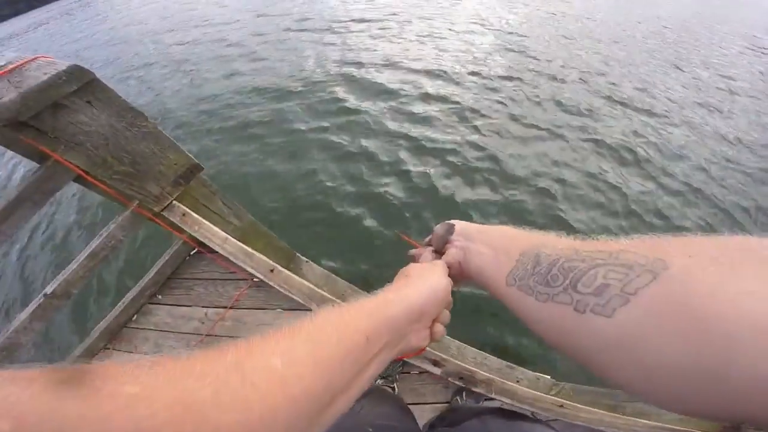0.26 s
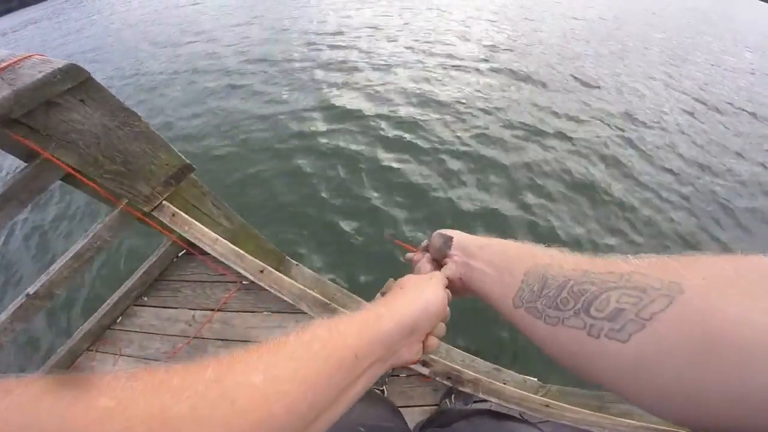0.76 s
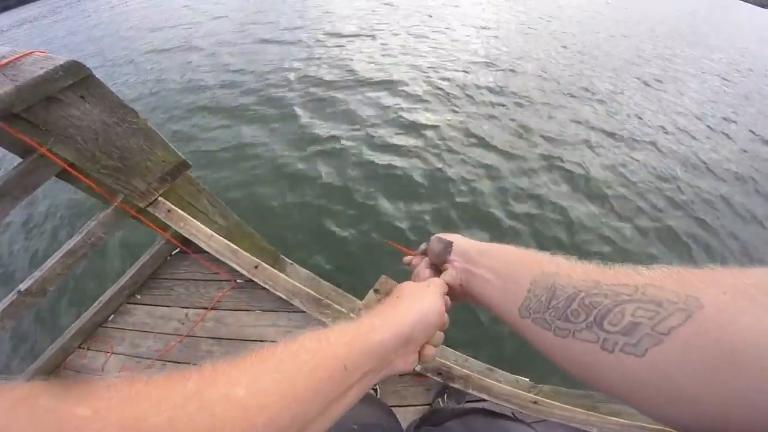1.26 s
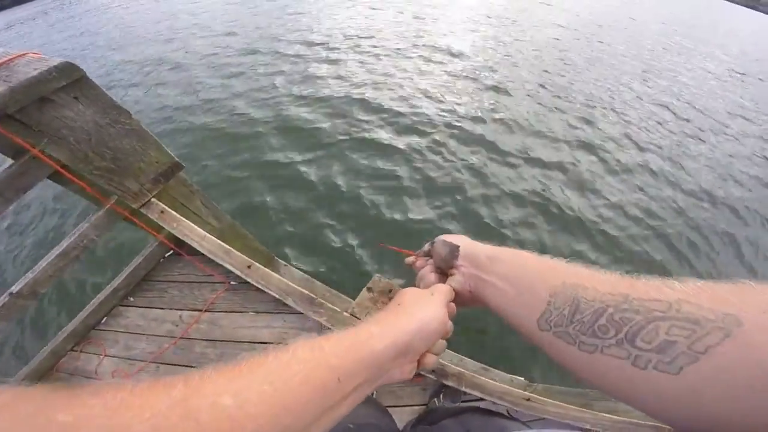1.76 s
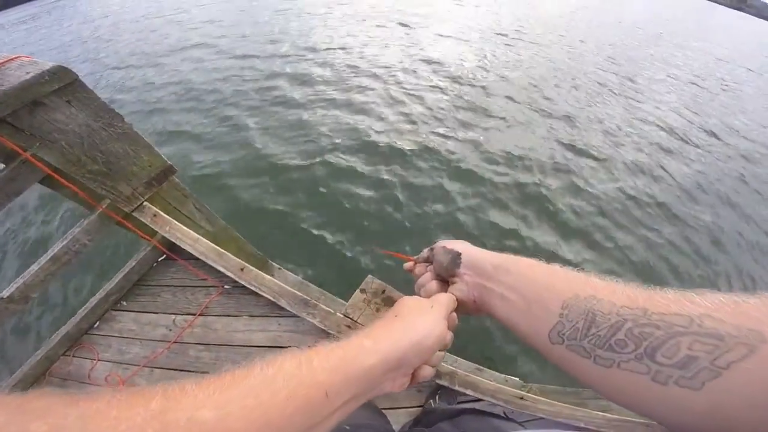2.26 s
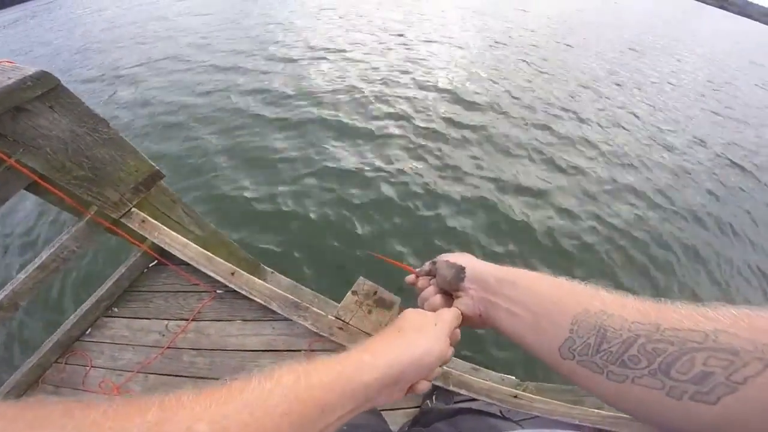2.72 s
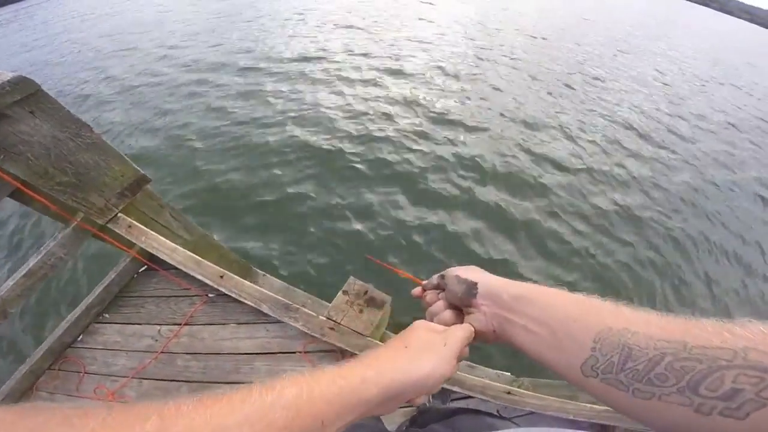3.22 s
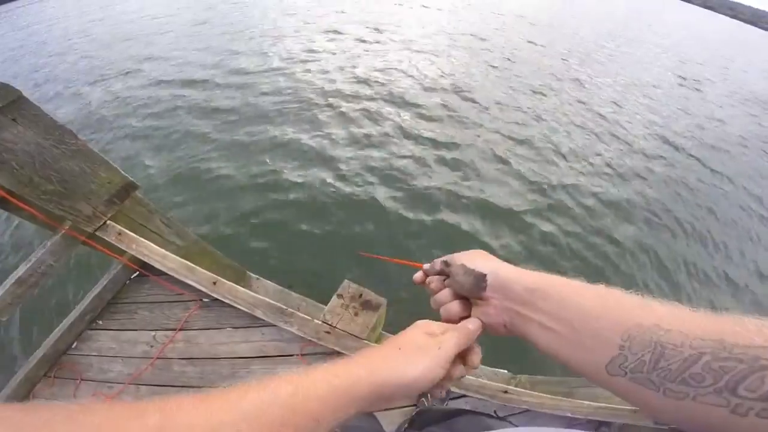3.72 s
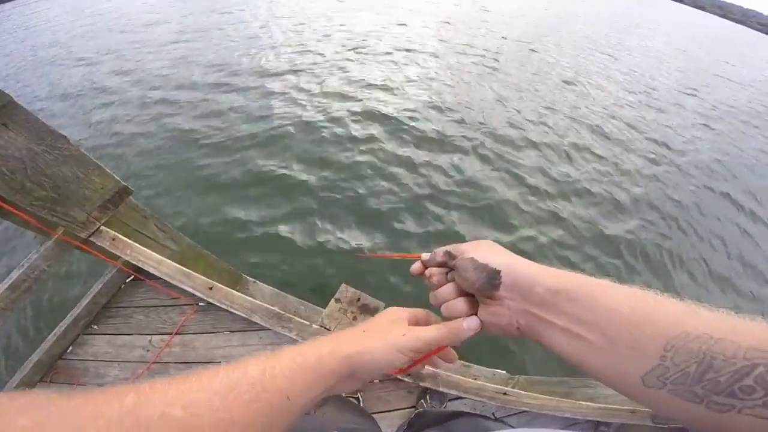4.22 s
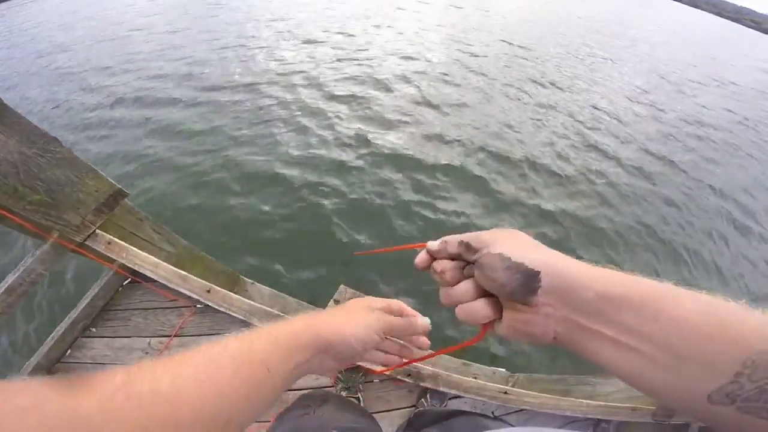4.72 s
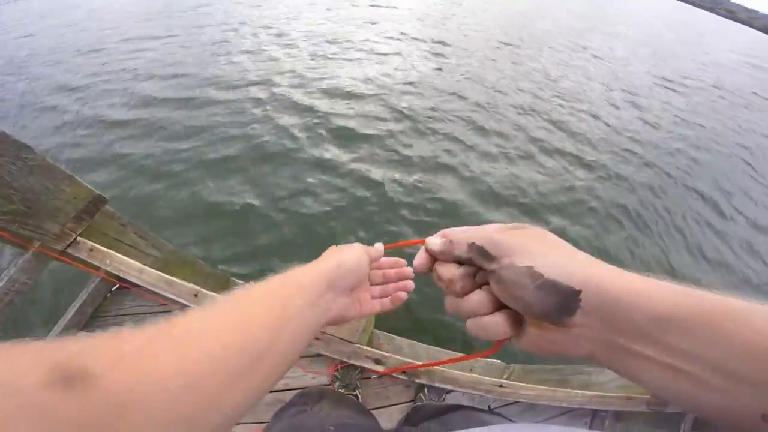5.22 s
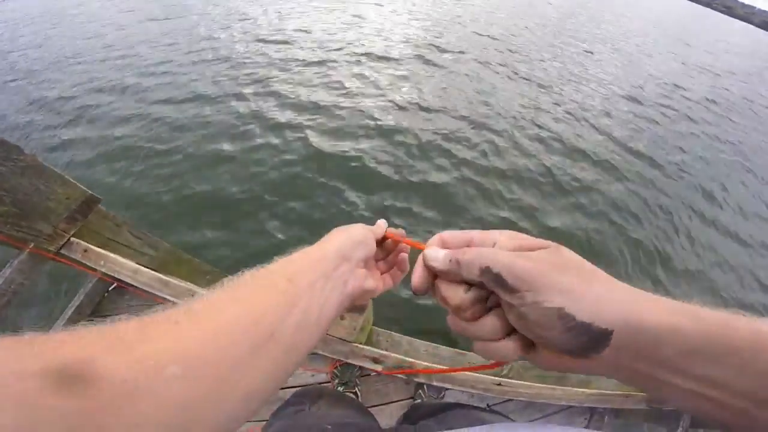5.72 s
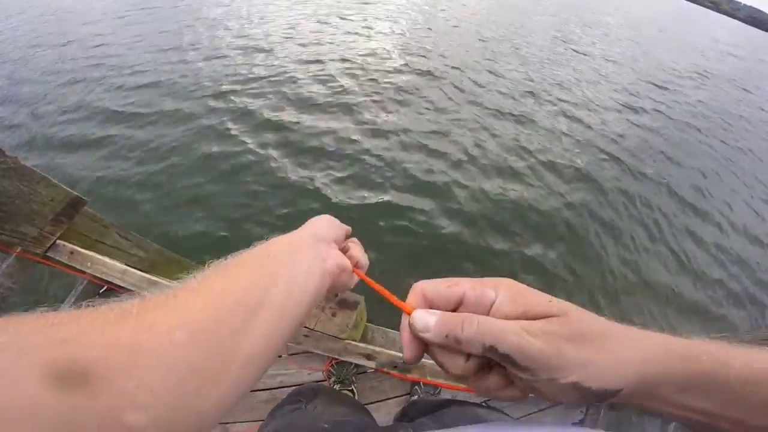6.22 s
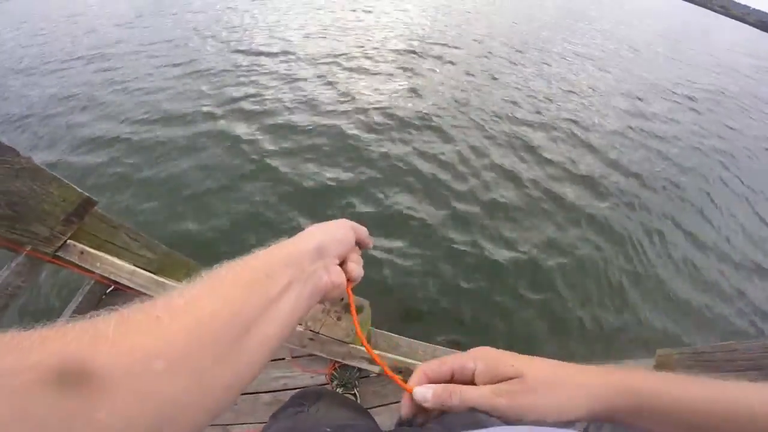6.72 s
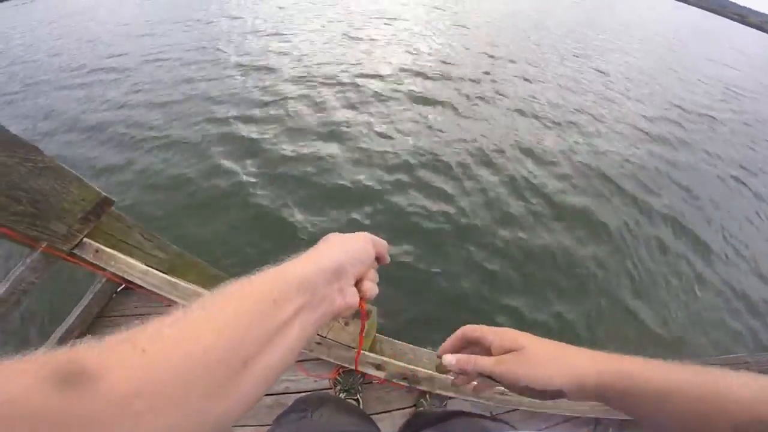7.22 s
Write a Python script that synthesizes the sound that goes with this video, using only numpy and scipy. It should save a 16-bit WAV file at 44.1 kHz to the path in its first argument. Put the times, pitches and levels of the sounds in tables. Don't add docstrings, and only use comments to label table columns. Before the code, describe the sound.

A small motorboat passes at a distance on open water. Its rapid low putter, about thirty beats a second, blends into a rough drone that brightens around two to four seconds, slides slightly lower, then weakens and wavers. A dull engine roar, soft wash and faint spray hiss surround it, while light wind bumps and flutters on a small camera microphone.

```python
import sys
import numpy as np
from scipy import signal
from scipy.fft import rfft, irfft
from scipy.io import wavfile
from scipy.ndimage import uniform_filter1d, map_coordinates

SR = 44100
rng = np.random.default_rng(int(sys.argv[2]) if len(sys.argv) > 2 else 0)


def materialize(psi):
    bounded = np.clip(np.atleast_2d(psi).T, -1, 1)
    quanta = np.round(bounded * 32767).astype(np.int16)
    wavfile.write(sys.argv[1], SR, quanta)


def invert_db(level):
    return 10 ** (np.asarray(level, dtype=float) / 20)


N = 329559
STEP = 256

# time_s, pitch_hz
SHAFT_SPEED = [(0.0, 32.33), (0.43, 32.29), (0.72, 31.77), (1.27, 31.67), (1.64, 31.86), (2.14, 30.67),
               (3.0, 30.28), (3.44, 29.67), (4.75, 28.38), (5.38, 27.18), (5.94, 28.88), (6.46, 27.1),
               (6.92, 28.78), (7.16, 27.86), (7.47, 28.27)]
# time_s, level_db
EXHAUST_STRENGTH = [(0, -4), (.2, -7.5), (1.08, 0), (1.75, -2.5), (2.05, 1.5), (2.6, -1.5), (3.2, 3),
                    (4, 1.5), (4.7, -2.5), (5.4, -6), (5.8, -7.5), (6.1, -5.5), (6.5, -9), (7, -3.5),
                    (7.47, -5)]
# time_s, bearing (0 coming, 1 nearest, 2 abeam, 3 and over leaving)
BOAT_BEARING = [(0, 0.83), (.7, 0.5), (1.8, 0.1), (1.96, 1.33), (2.4, 1.65), (2.8, 2), (4.5, 2), (5.1, 4),
                (7.47, 3)]
# multiple of the shaft pitch, level_db
COMING_COLOUR = [(1, -28), (2, -21.5), (3, -18.5), (4, -9), (5, -19), (6, -8.5), (7, -17.5), (8, -2),
                 (9, -13.5), (10, -12.5), (11, -8), (12, -19.5), (13, -22.5), (14, -18.5), (15, -22.5),
                 (16, -10), (17, -28), (18, -20), (19, -12), (20, -16.5), (21, -28.5), (22, -22),
                 (23, -35.5), (24, -46.5), (25, -45.5), (26, -45)]
NEAREST_COLOUR = [(1, -38.5), (2, -27.5), (3, -34), (4, -6.5), (5, -7), (6, -6.5), (7, -21.5), (8, 0),
                  (9, -8), (10, -8), (11, -10), (12, -16.5), (13, -9.5), (14, -14), (15, -15.5),
                  (16, -18.5), (17, -20.5), (18, -12.5), (19, -11), (20, -28), (21, -24.5), (22, -19),
                  (23, -26.5), (24, -32.5), (25, -34), (26, -47)]
ABEAM_COLOUR = [(1, -23.5), (2, -23), (3, -12.5), (4, -2), (5, -0.5), (6, -13.5), (7, -11.5), (8, -3),
                (9, -9), (10, -3.5), (11, -2), (12, -10), (13, 0), (14, -8.5), (15, -16.5), (16, -7),
                (17, -7), (18, -1.5), (19, -1), (20, -9), (21, -10.5), (22, -8), (23, -11), (24, -16),
                (25, -26), (26, -35)]
LEAVING_COLOUR = [(1, -29), (2, -17.5), (3, -27), (4, -0.5), (5, 0), (6, -9.5), (7, -13.5), (8, 0),
                  (9, -16.5), (10, -4.5), (11, -2.5), (12, -18), (13, -6), (14, -6.5), (15, -14.5),
                  (16, -22.5), (17, -20), (18, -6.5), (19, -6.5), (20, -14), (21, -15), (22, -15.5),
                  (23, -15), (24, -20), (25, -23), (26, -37.5)]
# bearing, level_db
HULL_THUD = [(0, -34.5), (1, -33), (2, -36), (3, -35)]
# bearing, level_db, share of the exhaust strength followed
HULL_DRONE = [(0, -25, 0.81), (1.5, -26, 0.83), (2, -37, 0.65), (3, -34, .3)]
# pitch_hz, level_db
ROAR_SPECTRUM = [(60, -29.5), (110, -7.5), (170, -2), (260, -3), (320, -3.5), (560, -3), (660, -7),
                 (730, -12.5), (800, -20), (1000, -26.5), (1400, -64)]
WASH_SPECTRUM = [(460, -31), (780, -2.5), (1010, -10.5), (1440, -15.5), (1540, -18), (1870, -11.5),
                 (2250, -20.5), (2800, -31.5), (3640, -58.5), (6160, -120)]
FIZZ_SPECTRUM = [(1410, -39.5), (2400, -22), (2540, -5), (2980, -5.5), (3540, 3.5), (4290, -1),
                 (4880, -18.5), (5360, -18), (5800, -5), (6770, -3), (7950, -24.5), (9220, -19.5),
                 (10500, -31), (13600, -59.5), (22000, -120)]
# pitch_hz, level_db
BUFFET_SPECTRUM = [(8, -24.5), (16, -1.5), (35, -1.5), (50, -8.5), (80, -40.5)]
FLUTTER_SPECTRUM = [(30, -31), (48, -0.5), (90, -1.5), (125, -7), (180, -10), (260, -16), (400, -41)]
# centre_s, half_length_s, buffet_rise_db, flutter_rise_db
WIND_GUSTS = [(0.116, 0.17, 11.5, 11), (.45, 0.17, 9.5, 1.5), (1.0, 0.46, 8, 5.5), (1.578, .13, 6, 13.5),
              (2.45, .2, 4, 4), (3.25, 0.28, 6, 1.5), (3.948, 0.35, 9, 8.5), (4.35, 0.2, 6, 5.5),
              (4.75, 0.32, 7, 8), (5.2, .2, -1, 4), (6.1, .15, -1, 3), (6.6, 0.065, 2, 4),
              (7.05, 0.15, 2, 3)]
# pitch_hz, level_db per Hz
HISS_SPECTRUM = [(1410, -26), (2400, -9.5), (2950, -4.5), (4230, -5.5), (5200, -9), (5830, -9), (6800, -13),
                 (13200, -25), (15000, -29)]
# centre_s, length_s, threshold_db over usual near 4 kHz
TREBLE_DIPS = [
    (4.455, .014, -1.5),
    (5.318, .031, 1.5),
    (5.5, .012, -3),
    (5.585, .016, -1),
]


def unit(x):
    return x / np.sqrt(np.mean(x ** 2) + 1e-20)


def curves(rows, t):
    s, *cols = np.transpose(rows)
    return [np.interp(t, s, c) for c in cols]


def wobble(rate_hz, size=N, step=1):
    at = np.arange(size) * step * rate_hz / SR
    return map_coordinates(rng.standard_normal(int(at[-1]) + 4), [at])


def rush(spectrum, patchy_db):
    z = signal.stft(rng.standard_normal(N + 8192), nperseg=512)[2]
    field = uniform_filter1d(rng.standard_normal(z.shape), size=6, axis=0)
    field = uniform_filter1d(field, size=12, axis=1)
    white = signal.istft(z * invert_db(patchy_db * unit(field)), nperseg=512)[1]
    f, db = np.transpose(spectrum)
    hz = np.fft.rfftfreq(len(white), 1 / SR)
    colour_db = np.interp(np.log(hz + 1), np.log(f), db, -120, -120)
    return unit(irfft(rfft(white) * invert_db(colour_db), len(white))[:N])


def spreading_db(lag_s=0):
    nearest_s, distance_m, speed_m_s = 1.5, 39.6, 12.3
    along_m = speed_m_s * (np.arange(N) / SR - nearest_s - lag_s)
    return -10 * np.log10(1 + (along_m / distance_m) ** 2)


def turns(first=.364):
    return np.cumsum(curves(SHAFT_SPEED, np.arange(N) / SR)[0]) / SR + first


def timing(order, bearing):
    def after(part):
        return np.exp(-2j * np.pi * order * part)

    second = .36 + .49 * np.clip(1 - bearing, 0, 1)
    train = 1 + .48 * after(.094) + .4 * after(.215) + second * after(.475)
    return -1j * after(.016) * train / abs(train)


def exhaust(angle, drift_db=.9, wander=.016, scatter_db=.9, jitter=.002):
    t = np.arange(N // STEP + 2) * STEP / SR
    strength_db = curves(EXHAUST_STRENGTH, t)[0]
    bearing = np.clip(curves(BOAT_BEARING, t)[0], 0, 3)
    thud_db = curves(HULL_THUD, bearing)[0] + 0.4 * strength_db
    hull_db, follows = curves(HULL_DRONE, bearing)
    drone_db = hull_db + follows * strength_db
    bark_db = -29 + strength_db

    order = np.transpose(COMING_COLOUR)[0]
    colours = np.array([COMING_COLOUR, NEAREST_COLOUR, ABEAM_COLOUR, LEAVING_COLOUR])[..., 1]
    colour = map_coordinates(colours, np.meshgrid(bearing, order - 1, indexing="ij"), order=1)
    bark = 10 * np.log10(np.sum(invert_db(2 * colour[:, 9:]), axis=1))
    lift = np.where(order < 8, (thud_db - colour[:, 3])[:, None], (bark_db - bark)[:, None])
    lift[:, 7] = drone_db - colour[:, 7]

    fading = np.array([wobble(2.97, size=len(t), step=STEP) for _ in order]).T
    slip = wobble(5, size=len(t), step=STEP)[:, None]
    phase = timing(order, bearing[:, None]) * np.exp(1j * wander * order * slip)
    shape = invert_db(colour + lift + drift_db * fading) * phase

    luck = rng.standard_normal((int(angle[-1]) + 3, 2))
    size_db, late = (map_coordinates(c, [angle + 0.15], order=1) for c in luck.T)
    spin = 2j * np.pi * (angle + jitter * late)
    now = np.arange(N) / SR
    wave = np.zeros(N)
    for k, row in zip(order, shape.T):
        wave += (np.interp(now, t, row) * np.exp(k * spin)).real
    return np.sqrt(2) * invert_db(scatter_db * size_db) * wave


def roar():
    level_db = -32 + 1.13 * spreading_db()
    return invert_db(level_db + 0.77 * wobble(1.8)) * rush(ROAR_SPECTRUM, patchy_db=1.26)


def wake():
    bow_past_s, bow_turn_s = 2.08, 0.43
    bow = (1 - np.tanh((np.arange(N) / SR - bow_past_s) / bow_turn_s)) / 2
    surge = wobble(5)
    wash_db = -53 + .3 * spreading_db() + 3.5 * bow + 0.35 * surge
    fizz_db = -59 + 4.76 * spreading_db(lag_s=.2) + .4 * surge
    wash = invert_db(wash_db) * rush(WASH_SPECTRUM, patchy_db=0.8)
    return wash + invert_db(fizz_db) * rush(FIZZ_SPECTRUM, patchy_db=1.05)


def wind():
    calm_buffet_db, calm_flutter_db = -44, -40
    s, half, *rises = np.transpose(WIND_GUSTS)
    swells = np.exp(-((np.arange(N) / SR - s[:, None]) / half[:, None]) ** 2)
    buffet_db, flutter_db = np.array(rises) @ swells
    lumps = wobble(9)
    buffet = unit(invert_db(.8 * lumps) * rush(BUFFET_SPECTRUM, patchy_db=-2.0))
    flutter = unit(invert_db(2.6 * lumps) * rush(FLUTTER_SPECTRUM, patchy_db=0.2))
    return invert_db(calm_buffet_db + buffet_db) * buffet + invert_db(calm_flutter_db + flutter_db) * flutter


def hiss():
    return invert_db(-66) * rush(HISS_SPECTRUM, patchy_db=0.9)


def thin_treble(x, edge_hz=13200, edge_db=3):
    hz, t, z = signal.stft(x, SR, nperseg=1024, noverlap=896)
    usual = np.median(abs(z), axis=1)[:, None]
    threshold_db = edge_db + 3 * wobble(18, size=len(t), step=128)
    least = usual * invert_db(threshold_db) * (hz > edge_hz)[:, None]
    for s, length, keep_db in TREBLE_DIPS:
        dip = usual[np.searchsorted(hz, 4000)] * invert_db(keep_db) * (abs(t - s) < length / 2)
        least = np.maximum(least, dip * (hz > 2300)[:, None])
    return signal.istft(z * (abs(z) > least), SR, nperseg=1024, noverlap=896)[1][:N]


def scene():
    return (exhaust(turns()) + roar() + wake() + wind())[None]


def low_pass(x):
    return signal.sosfilt(signal.butter(12, 15110, fs=SR, output="sos"), x)


def record(dry):
    fade = np.minimum(1, np.minimum(np.arange(N), N - np.arange(N)) / 128)
    heard = thin_treble(dry[0] + hiss())
    return low_pass(fade * heard[None])


dry = scene()
out = record(dry)
materialize(out)
```